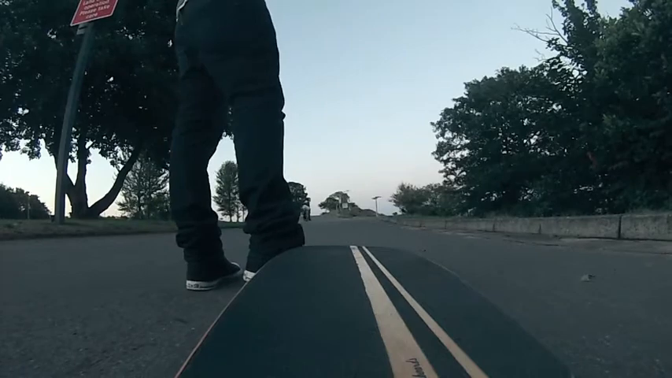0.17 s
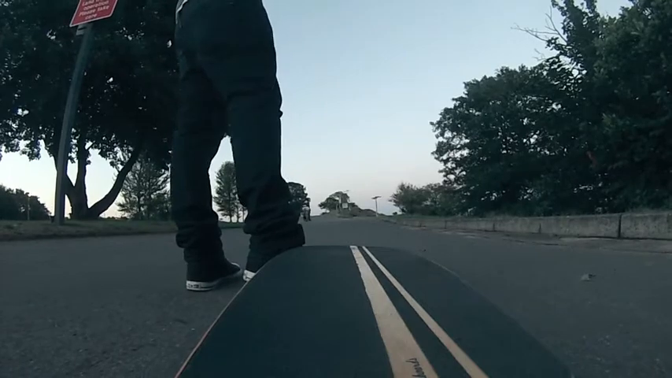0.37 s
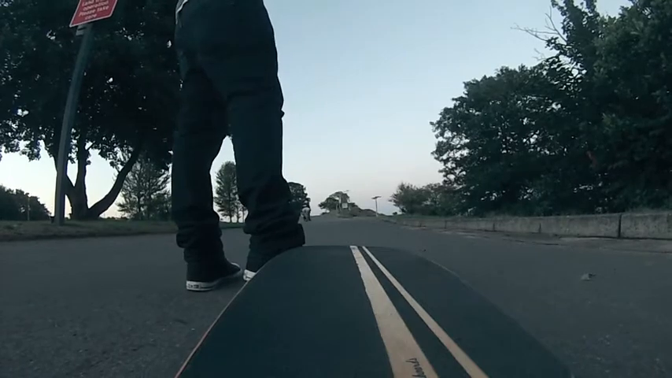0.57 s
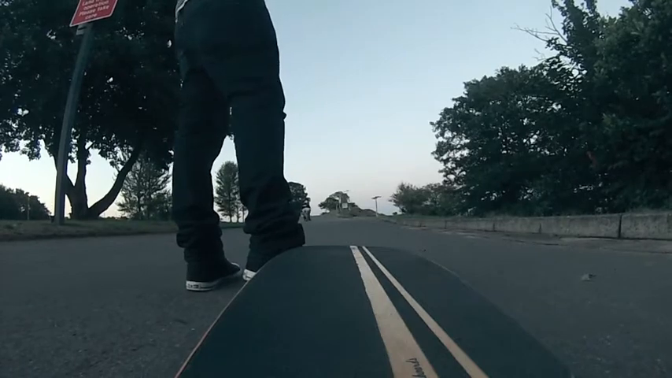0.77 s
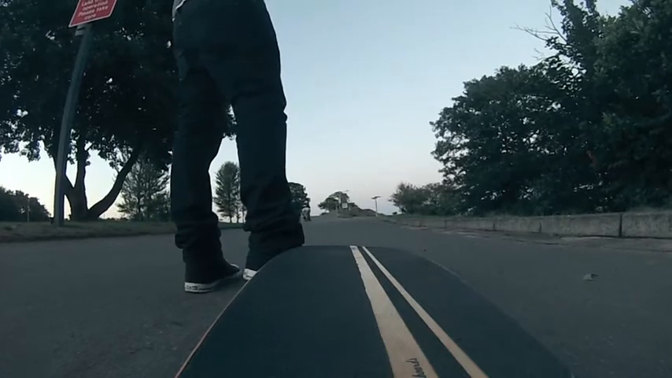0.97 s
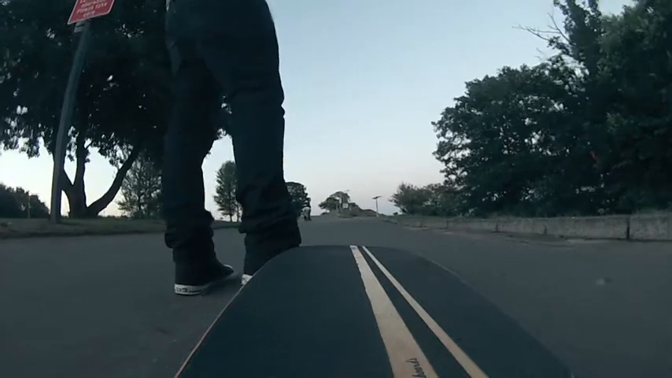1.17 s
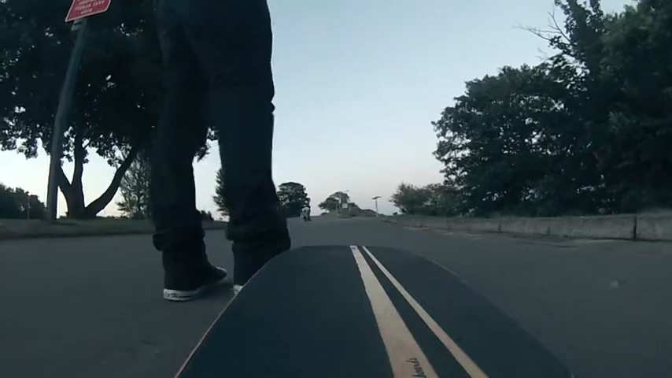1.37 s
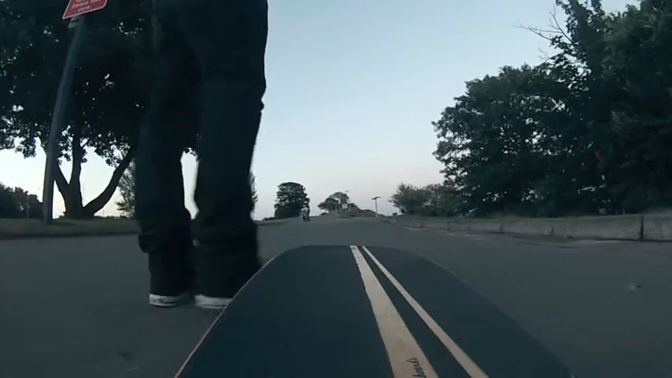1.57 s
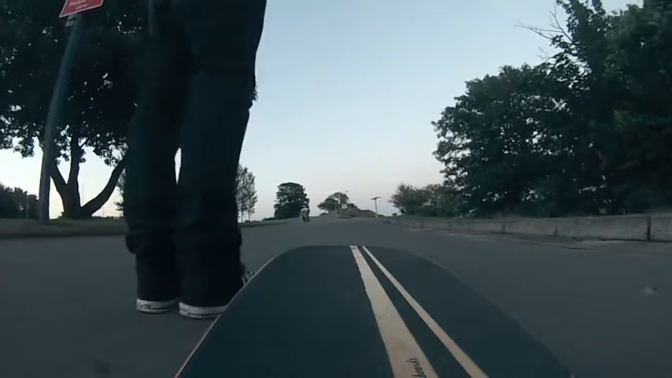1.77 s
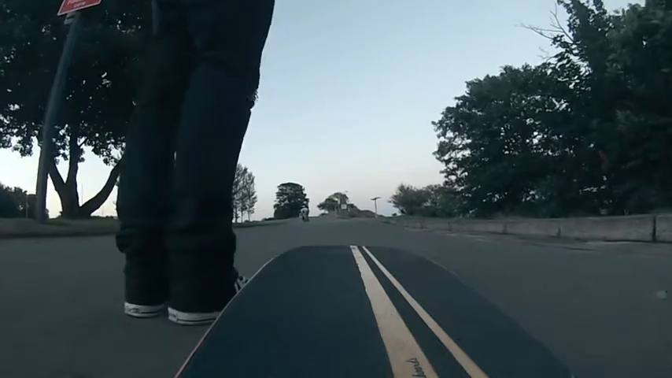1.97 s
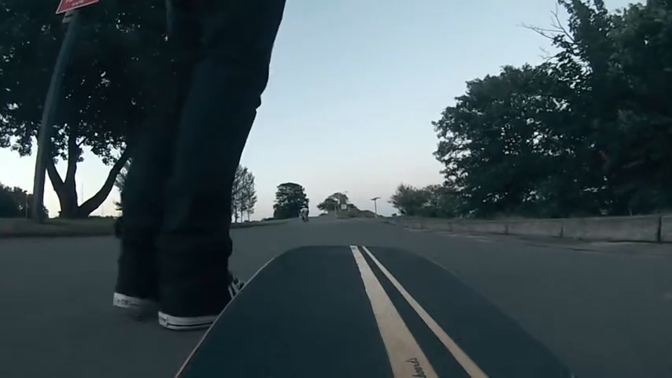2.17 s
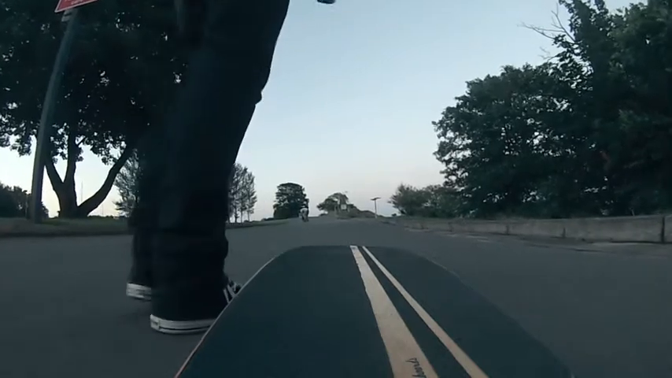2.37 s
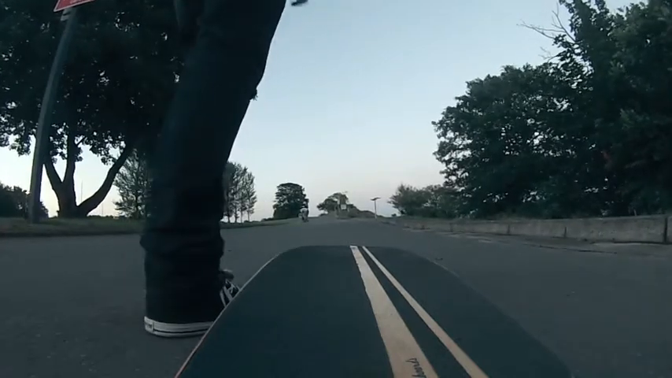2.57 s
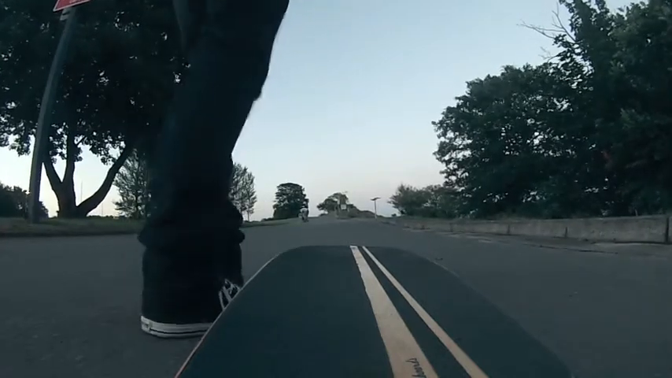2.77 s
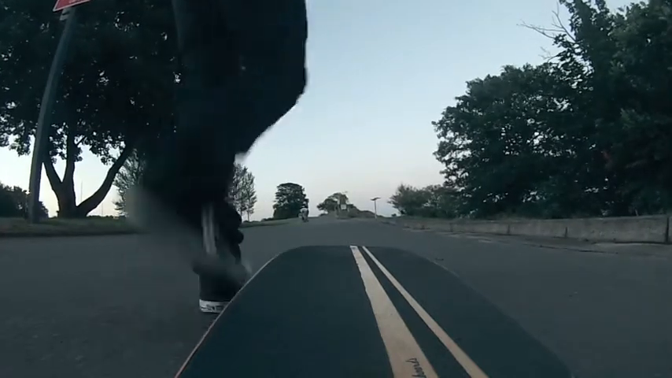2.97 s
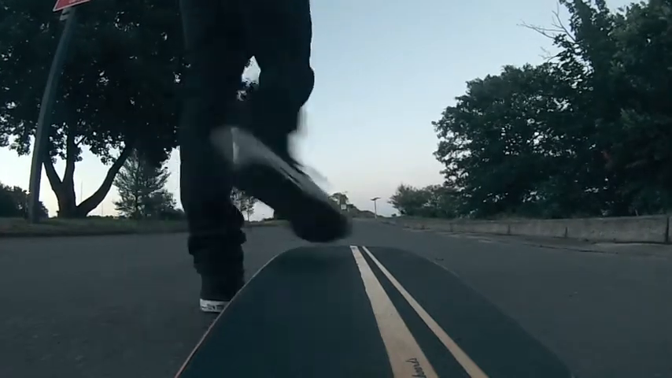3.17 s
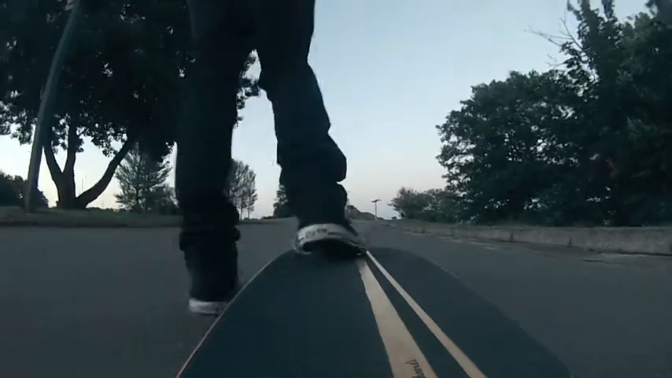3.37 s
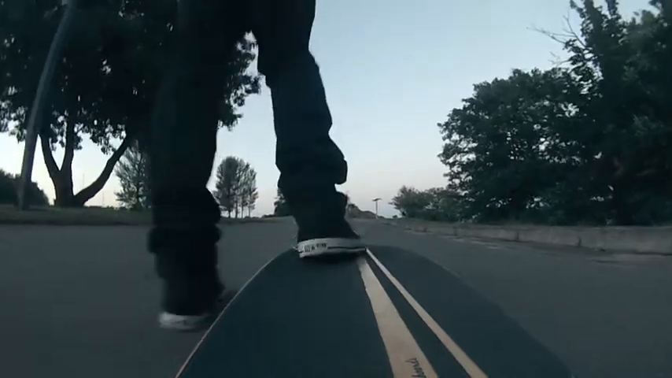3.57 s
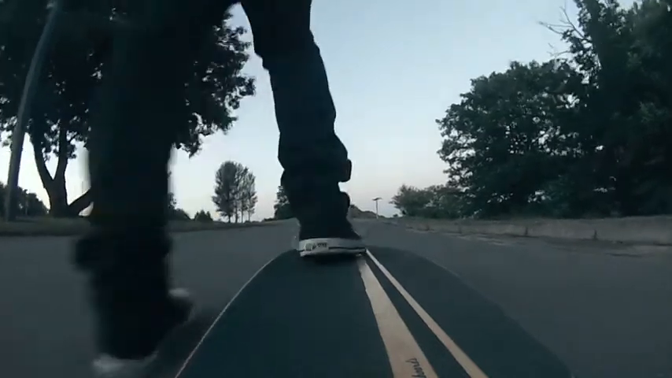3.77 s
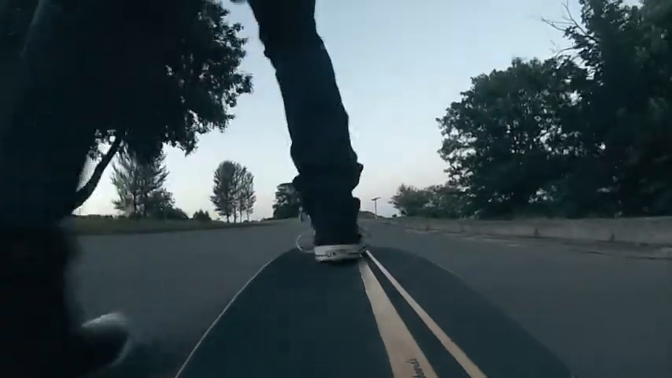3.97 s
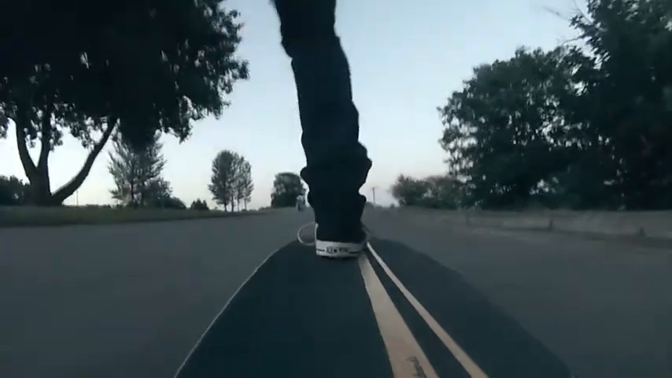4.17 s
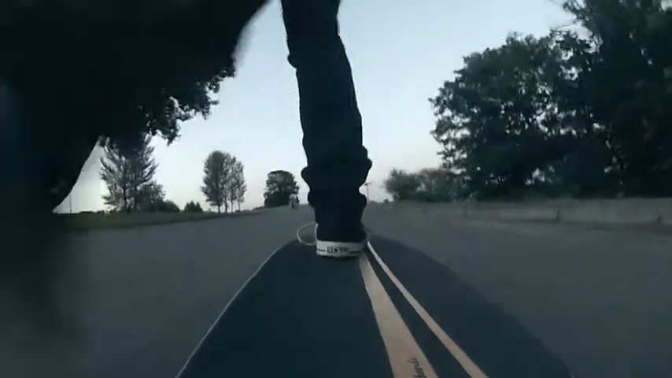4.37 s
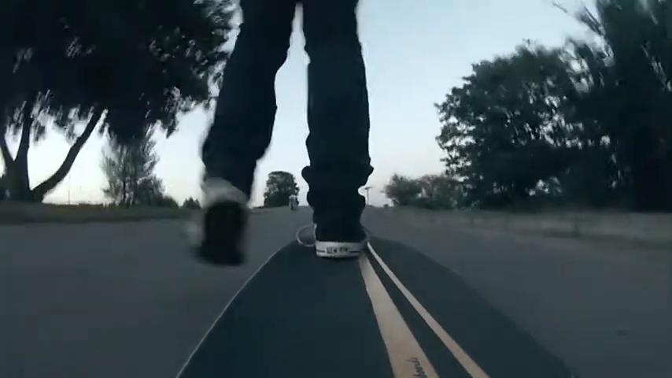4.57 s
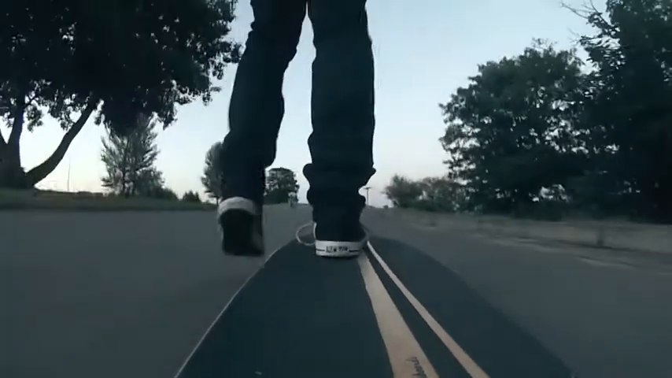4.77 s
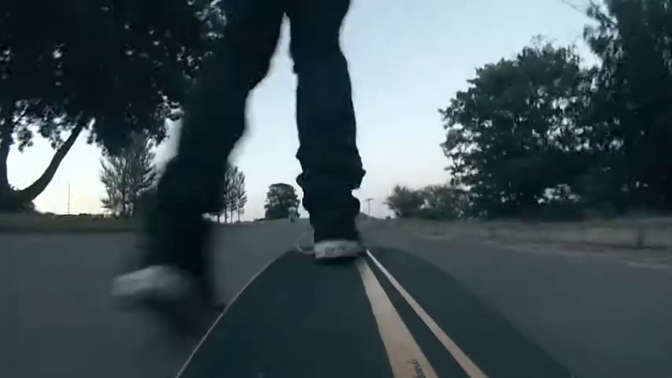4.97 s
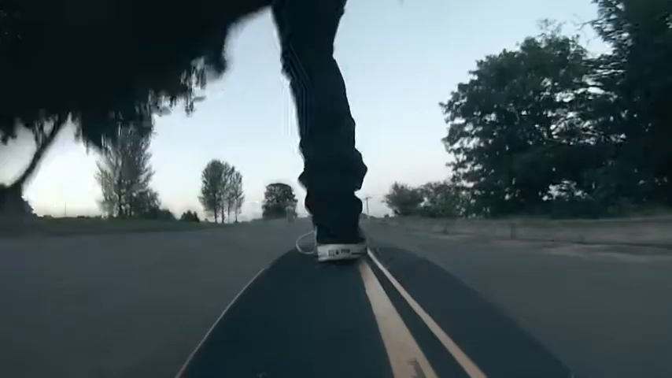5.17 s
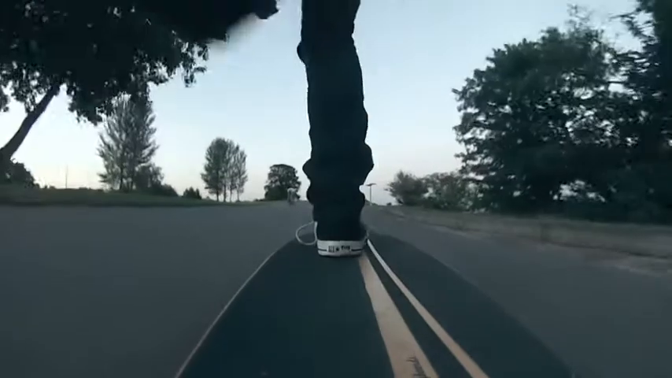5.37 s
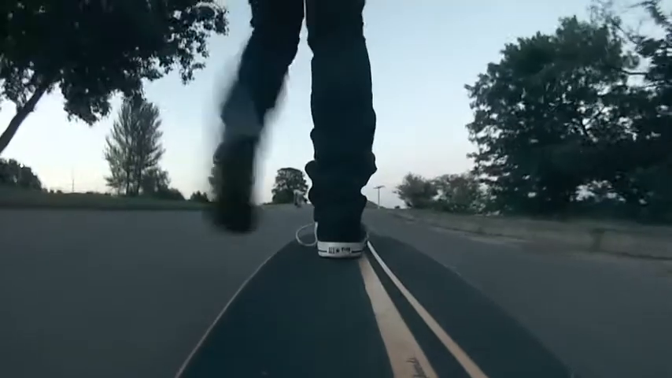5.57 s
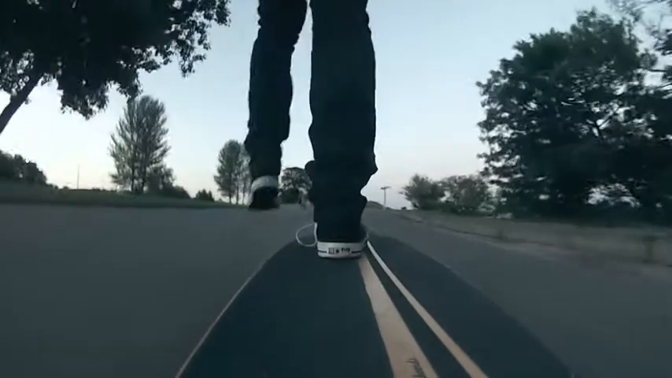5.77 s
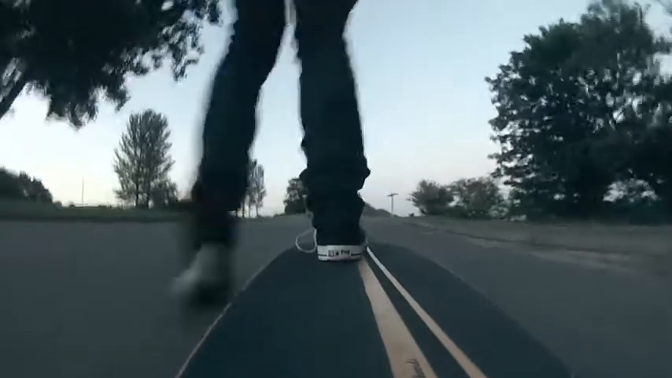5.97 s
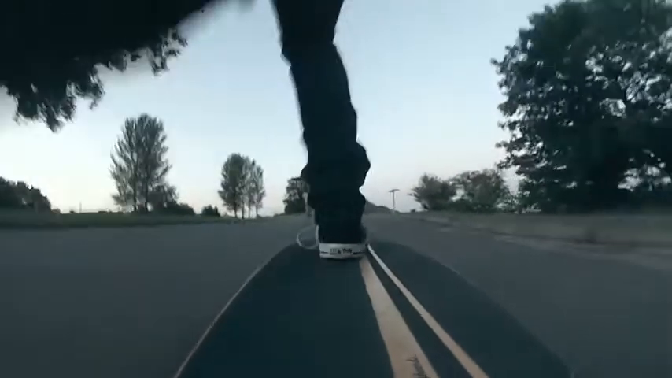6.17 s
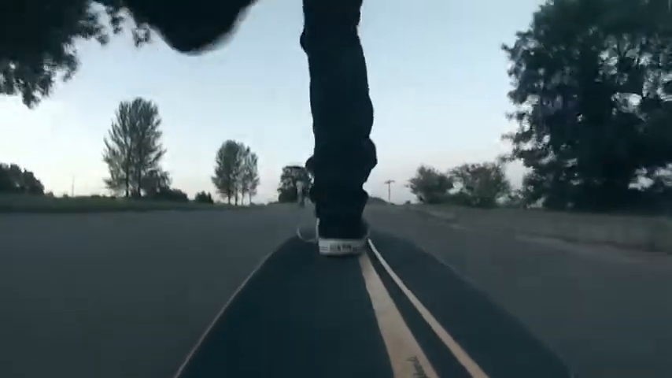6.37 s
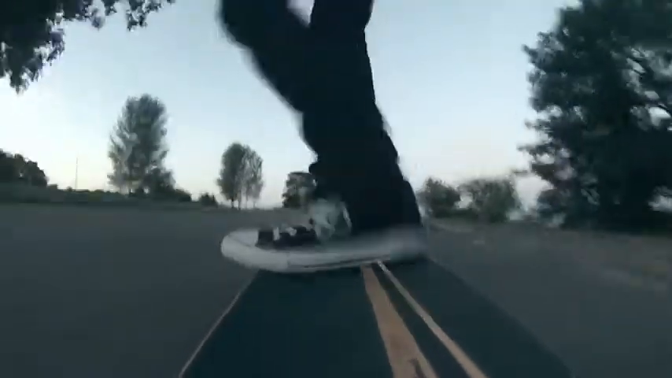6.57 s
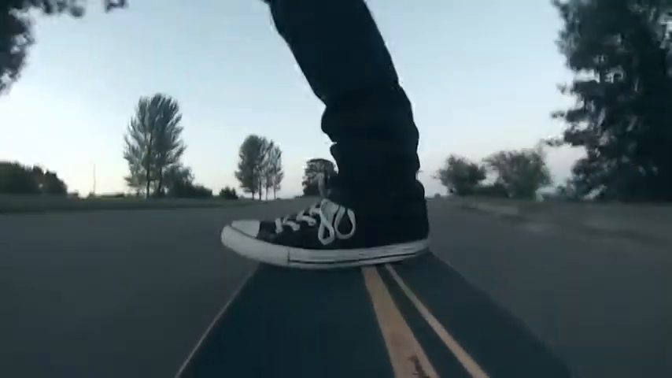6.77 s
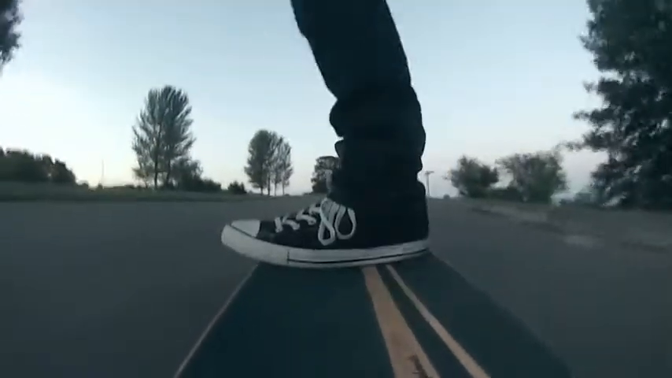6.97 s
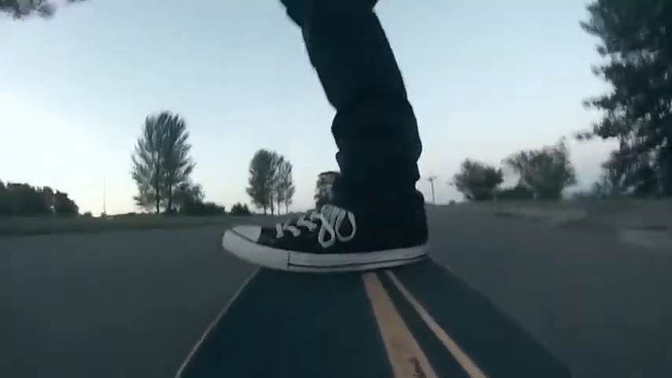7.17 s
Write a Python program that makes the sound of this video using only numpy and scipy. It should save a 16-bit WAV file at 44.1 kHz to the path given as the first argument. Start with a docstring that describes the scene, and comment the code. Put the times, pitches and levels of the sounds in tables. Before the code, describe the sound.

Quiet distant traffic hum, a few shoe ticks on wood, then a longboard rolls off with loud, hollow, rattling wheels over coarse asphalt.

```python
"""Far traffic roars, hisses and hums behind a longboard on a seafront path, the microphone fixed to its deck.
The rider shuffles: board and shoes tick, the deck sways, soles tap and scrape. A shoe lands, slides, and the
board rolls. Stones in the coarse asphalt knock the wheels and ring the deck's modes, over random fine grit,
a low rumble and a thin sizzle of tread noise. A limiter holds down the hardest knocks."""
import sys
import numpy as np
from scipy import signal
from scipy.fft import rfft, irfft, next_fast_len
from scipy.io import wavfile
from scipy.ndimage import uniform_filter1d, minimum_filter1d

SR = 44100
rng = np.random.default_rng(int(sys.argv[2]) if len(sys.argv) > 2 else 0)


def file_out(sig):
    """Save sig as 16-bit WAV at sys.argv[1]."""
    # one column per channel
    cols = np.atleast_2d(sig).T
    # limit, then scale
    lim = np.clip(cols, -1, 1)
    pcm = np.round(lim * 32767).astype(np.int16)
    wavfile.write(sys.argv[1], SR, pcm)


N = 317961
TIME = np.arange(N) / SR   # seconds

# Each push makes the board faster. Each row: time in seconds, speed as a share of cruising speed.
ROLLING_SPEED = [(3.3, 0.52), (4.3, 0.74), (5.0, 0.98), (5.4, 1.156), (6.2, 1.15), (7.2, 1.13)]
# How coarse the asphalt is under the wheels. Each row: time in seconds, coarseness in dB.
ASPHALT_COARSENESS = [(3.41, -7), (3.54, 8.5), (3.62, -8), (3.7, 3.5), (4.2, 1), (4.46, -8), (4.54, 6),
                      (4.66, 3.5), (4.75, -11), (4.785, 15.5), (4.85, -8), (4.94, 4), (5.05, -10),
                      (5.17, -1), (5.55, -6.5), (5.63, -10), (5.68, -6), (5.8, -2.5), (5.85, -20),
                      (5.9, 6.5), (6.01, -9), (6.14, 3.5), (6.22, 0.5), (6.47, -4), (6.51, -11), (6.56, -3),
                      (6.64, -2), (6.69, 9), (6.72, -4), (6.81, -1), (7.2, -4)]
# Colour of soft tread or sole on the road's fine texture. Each row: frequency in Hz, relative level in dB per Hz.
ROAD_HISS_COLOUR = [(2200, 10), (3000, 12), (4100, -6), (5000, -0.5), (5700, 5), (7100, 6), (8900, -4.5),
                    (10200, -1), (12500, -12), (15500, -27)]

START_S, START_RAMP_S = 3.22, 0.062   # the board begins to roll
# the deck's usual hollow body and treble, relative to its middle modes
DECK_BODY_DB, DECK_TREBLE_DB = -1.5, -12
# the pitch of ringing modes wanders: spread, and turns per second
WAVER_HZ, WAVERS_PER_S = 36.5, 30


def wheels():
    """Stones knock, grit rattles with speed and coarseness, the trucks ring on, and the road rumbles and sizzles."""
    # The biggest stones, before the deck's common gain. Each row: time in seconds, level in dB,
    # hollow body in dB relative to that level, treble in dB relative to that level.
    big_stones = [(3.436, -38.5, -0.5, -18), (3.4672, -30, -7, -12), (3.4854, -34, -6.5, -16),
                  (3.5385, -37, -8, -16), (3.5481, -35, -1, -13), (3.56, -37.5, -5.5, -16),
                  (3.596, -37.5, -2, -17), (3.6554, -38.5, 2.5, -16), (3.668, -44.5, -1, -9),
                  (3.6838, -39.5, -5, -17), (3.7016, -48, -2, -24), (3.732, -45, 6, -11),
                  (3.752, -33.5, -1, -19), (3.7803, -39.5, -4, -13), (3.8041, -22, 2, -14.5),
                  (3.8118, -41.5, -7, -11), (3.8195, -28.5, -4.5, -8), (3.843, -37, -1, -21),
                  (3.857, -32, -1, -23), (3.877, -27.5, -1, -9.5), (3.9112, -28.5, 2.5, -12.5),
                  (3.9273, -44, -6, -12), (3.9511, -20.5, -3, -12.5), (3.968, -45, -11, -14),
                  (3.989, -32.0, -4.5, -17), (4.0246, -29.5, 2.5, -17), (4.0309, -23, 5.5, 1),
                  (4.0382, -27, 5, -11), (4.0477, -32.0, -5, -8), (4.0745, -30, -4.5, -11.5),
                  (4.0891, -29.5, -3, -10.5), (4.1386, -36.5, -0.5, -12), (4.1615, -47, 2, -8),
                  (4.199, -39, 1, -15), (4.2155, -32.5, 5.5, -3), (4.237, -42.5, 5, -10),
                  (4.267, -35, 0, -13), (4.2873, -30, -5.5, -13.5), (4.3151, -37.0, -2, -15),
                  (4.373, -40.0, -12, -14.5), (4.395, -44.5, 6, -15), (4.4315, -45, 0, -16),
                  (4.4473, -46, 0, -13), (4.4544, -38, -3, -21), (4.485, -30, -6.5, -12.5),
                  (4.5048, -30.5, -8, -19), (4.5299, -35, 5, -5.5), (4.5376, -35, -2, -14),
                  (4.5531, -23, -5, -17), (4.5814, -32.0, 0, -12), (4.6013, -22.0, -7, -15),
                  (4.6175, -36, 6, -6), (4.6317, -26.5, -2, -9.5), (4.6446, -36, 2.5, -6),
                  (4.6578, -25.5, -3, -13), (4.6855, -35.5, -4, -10), (4.702, -35.5, 2, -8.5),
                  (4.7253, -39.5, 0.5, -13), (4.7766, -40, 9.5, -25), (4.7949, -12.5, 2.5, -8),
                  (4.8363, -31, -12, -10.5), (4.883, -27.5, -6.5, -9), (4.892, -33, -6, -16),
                  (4.9185, -37, -11, -20), (4.9296, -22.5, -15, -10), (4.9428, -32.5, 3.5, -10),
                  (4.9668, -24, -3.5, -11.5), (4.9865, -37, 2, -8), (5.0089, -18, -5, -10.5),
                  (5.022, -36, -10, -7), (5.0748, -29.5, 1, -1.5), (5.0848, -31.5, -5, -11),
                  (5.1109, -31, -15, -14), (5.1205, -26, -8.5, -7), (5.1633, -29.5, 1.5, -8),
                  (5.1728, -31, 7, -11), (5.233, -38.5, -1, -8), (5.2415, -35.5, -1, -14),
                  (5.2582, -35.0, -7, -8.5), (5.27, -37, -6, -18), (5.299, -34.5, -7, -7.5),
                  (5.317, -37, 4, -17), (5.3251, -34.5, 0, -15), (5.3406, -36, 7.5, -4.5),
                  (5.353, -30, -13, -16), (5.369, -28, -1, -2.5), (5.3744, -19, -4, -17),
                  (5.4211, -36, -5, -14), (5.4257, -39.0, -4, -10), (5.4437, -31, 1.5, -6.5),
                  (5.4758, -27.5, -13, -14.5), (5.51, -30, 0.5, -10), (5.5173, -34.5, -11, -16),
                  (5.523, -34, 0, -3), (5.5353, -27.0, 1, -11.5), (5.5702, -23, -3, -10.5),
                  (5.6026, -37, -10, -5.5), (5.6744, -33.5, -3, -7.5), (5.7043, -21.5, -10, -13),
                  (5.719, -33, 0, -12), (5.7301, -19.5, -1.5, -16), (5.761, -28.5, -14, -5.5),
                  (5.7745, -42, -1, -14), (5.788, -30, -2, -3), (5.7941, -30.5, -2, -14),
                  (5.817, -33, 0, -5), (5.8737, -39.5, 5, -8), (5.895, -32, -4.5, -11.5),
                  (5.912, -39, -3, -9), (5.9253, -33.5, -5, -7), (5.9408, -38.5, 5, -5),
                  (5.9721, -30.0, -2, -7), (5.987, -39, -4, -14), (6.038, -35.5, 0, -20),
                  (6.0476, -26, -7, -22), (6.0827, -37, 1, -8), (6.0886, -33, -6, -6.5),
                  (6.0942, -32.5, -1, -20), (6.118, -33.0, 4, -9), (6.1283, -29.5, -7, -18),
                  (6.1378, -36, 1, -8), (6.1547, -27.5, -3, -10.5), (6.1618, -31.5, 2, -5),
                  (6.1855, -29, -2.5, -11), (6.2222, -40, 1, -20), (6.2447, -34, -6, -15),
                  (6.2623, -32, -4, -6), (6.2727, -38, -6, -11), (6.3005, -41, 4, -16),
                  (6.3154, -27.5, -10, -19), (6.3192, -24, -8, -13), (6.3375, -33.5, -6, 0.5),
                  (6.345, -35, -4, -9), (6.3842, -32, 0, -5), (6.4011, -33.5, 1, -11),
                  (6.4092, -37, -4, -8), (6.4208, -30, -11, -9), (6.428, -26, -10, -7),
                  (6.4376, -27.5, -10, -7), (6.446, -35, -10, -10), (6.465, -27, -10, -9.5),
                  (6.476, -26.5, -4, -11), (6.4859, -31, -6, -11), (6.5216, -30.5, -7, -17),
                  (6.5459, -29, -5.5, -7), (6.5602, -32.5, 0, -13), (6.5759, -30, 2, -18),
                  (6.6054, -38, -3, -9), (6.6239, -37, -5, -9), (6.6398, -29, -12, -14.5),
                  (6.6644, -29, -4, -15.5), (6.679, -37, -11, -14), (6.6849, -40, 1, -16),
                  (6.6963, -12.5, -11, -12), (6.7326, -30, -5, -13), (6.7438, -33, -11, -17),
                  (6.7688, -36.5, 4, -8), (6.7856, -35, -8, -4), (6.8051, -25, -4, -13),
                  (6.815, -41, 2, -3), (6.8212, -38, -5, -12), (6.8294, -35, -12, -3.5),
                  (6.8445, -44, -10, -10), (6.8659, -32.5, 1, -10), (6.8731, -30.5, -5, -5.5),
                  (6.9025, -25.5, -1.5, -18), (6.9093, -32, 0, 0), (6.9361, -33.5, -5, -11),
                  (6.9917, -27, -14, -8.5), (6.9998, -35, -1.5, -11), (7.0525, -30, 1, -8),
                  (7.072, -30, -6, -14.5), (7.0968, -38, -1, -11), (7.1381, -37.5, 0, -21),
                  (7.1462, -31.5, 3, -8.5), (7.1728, -33, 2.5, -16), (7.1799, -20, -8, -2),
                  (7.1981, -32, 2, -9)]
    # Longer, purer rings of the metal trucks. Each row: frequency in Hz, width in Hz, relative level in dB.
    truck_modes = [(694, 8.3, -29), (856, 20, -16), (910, 19, -23)]
    grit_cruising_db, grit_db_per_doubling = -38.5, 17   # growth per doubling of speed

    speed, coarse_db = in_time(ROLLING_SPEED)[0], in_time(ASPHALT_COARSENESS)[0]
    moving = np.clip((TIME - START_S) / START_RAMP_S, 0, 1)
    hits = np.r_[pebbles(), big_stones]
    sizzle = tread(hits, coarse_db, crunch_s=0.0013)
    grit_db = grit_cruising_db + grit_db_per_doubling * np.log2(speed) + coarse_db
    grit = grains(per_s=1700, spread_db=10, body_db=2.0, treble_db=-4.5, scatter_db=4.0, even_s=0.04)
    rattle = stones(hits, clean_db=0.5) + from_db(grit_db) * grit
    trucks = np.zeros(N)
    for hz, width, db in truck_modes:
        per_click = 2 * np.pi * width / SR   # a narrow mode gathers less from each click
        trucks += from_db(db) * per_click * wavering_ring(rattle, hz, width, WAVER_HZ)
    return moving * (rattle + trucks + rumble() + sizzle)


def stones(hits, clean_db):
    """A slow wheel meets a stone more cleanly; a fast one chatters more. Each also nudges the whole deck."""
    common_db, thud_db = 22.5, -20
    s, db, body, treble = np.transpose(hits)
    speed = np.interp(s, *np.transpose(ROLLING_SPEED))
    clack = knocks(s, db, body - DECK_BODY_DB, treble - DECK_TREBLE_DB, scatter_db=3.0, graze_s=0.0044,
                   graze_db=-3.0 - clean_db * (1.0 - speed), graze_treble_db=0.5, contact_hz=11300)
    thuds = ring(click_train(s, from_db(db + thud_db)), hz=250, width=29)
    return from_db(common_db) * clack + thuds


def pebbles(count=260):
    """Small stones at uneven spacings: more, louder and harder with speed, louder on coarse asphalt."""
    # at cruising speed; the spread is the most that chance adds or takes away
    per_s, cruising_db, spread_db, cruising_treble_db = 50, -43, 4.0, -12
    # growth per doubling of speed, and the share of the asphalt's coarseness that is followed
    db_per_doubling, treble_db_per_doubling, follows = 13.5, 10, 0.49

    gap, size, hollow, edge = rng.uniform(-1, 1, (count, 4)).T
    speed, coarse_db = in_time(ROLLING_SPEED)[0], in_time(ASPHALT_COARSENESS)[0]
    travelled = np.cumsum(speed * (TIME > START_S)) / SR
    places = np.cumsum(1 + 0.88 * gap) / per_s
    s = np.interp(places, travelled, TIME, right=2 * TIME[-1])   # stones never reached fall past the end
    doublings = np.log2(np.interp(s, TIME, speed))
    db = cruising_db + db_per_doubling * doublings
    db = db + follows * np.interp(s, TIME, coarse_db) + spread_db * size
    body = DECK_BODY_DB + 6 * hollow
    treble = cruising_treble_db + treble_db_per_doubling * doublings + 5 * edge
    return np.c_[s, db, body, treble]   # columns as for the biggest stones


def tread(hits, coarse_db, crunch_s):
    """Under load the soft wheels sizzle unevenly on fine texture; the harder a stone, the more it crunches."""
    loaded_s, loading_s = 4.47, 0.07
    loaded_db, unloaded_change_db, follows, crunch_db = -67, -39, 0.36, -17
    s, db, body, treble = np.transpose(hits)
    unloaded = 1 - np.clip((TIME - loaded_s) / loading_s, 0, 1)
    hiss_db = loaded_db + unloaded_change_db * unloaded + follows * coarse_db
    clicks = click_train(s, from_db(db + treble + crunch_db))
    crunch = signal.lfilter([1], [1, -np.exp(-1 / (crunch_s * SR))], clicks + 1e-18)
    return noise(ROAD_HISS_COLOUR) * (from_db(hiss_db + 8.0 * drift(270)) + crunch)


def rumble():
    """The faster the road's unevenness passes, the higher the rumble; the deck drones above it."""
    # Rumble at cruising speed. Each row: frequency in Hz, relative level in dB per Hz.
    rumble_colour = [(55, -3), (85, -2), (115, 6), (150, 0), (190, -3), (240, -7), (310, -8.5), (400, -28)]
    # Rumble over time, before its trim. Each row: time in seconds, level in dB.
    rumble_curve = [(3.38, -52), (3.56, -41), (3.6, -45), (3.84, -41), (3.95, -47), (4.03, -41),
                    (4.07, -50), (4.25, -43), (4.36, -48.5), (4.38, -42), (4.59, -39), (4.67, -56),
                    (4.79, -38), (4.82, -51), (4.94, -39), (5.04, -55), (5.07, -43.5), (5.34, -47.5),
                    (5.38, -38), (5.4, -65), (5.43, -55), (5.54, -44), (5.61, -67), (5.67, -48),
                    (5.78, -45), (5.84, -52), (5.87, -45), (7.2, -47.5)]
    # The deck's drone. Each row: frequency in Hz, relative level in dB per Hz.
    drone_colour = [(170, -8.5), (240, 1), (310, -6), (400, -13), (560, -5.5), (800, -12)]
    # Drone over time, before its trim. Each row: time in seconds, level in dB.
    drone_curve = [(3.38, -66), (3.46, -51), (4.22, -47), (4.33, -50), (4.52, -43), (4.74, -47.5),
                   (4.79, -40), (4.82, -48.5), (5.38, -48.5), (5.4, -71), (5.58, -54), (5.6, -67),
                   (5.72, -48), (5.75, -57), (6.09, -38.5), (6.42, -46), (6.68, -38), (6.74, -58),
                   (7.17, -48), (7.2, -60)]
    rumble_trim_db, drone_trim_db = 2, -2.5

    distance = np.cumsum(in_time(ROLLING_SPEED)[0])
    unevenness = np.interp(distance % N, np.arange(N), noise(rumble_colour))
    low = from_db(rumble_trim_db + in_time(rumble_curve)[0]) * steady(unevenness, even_s=0.066)
    drone = steady(noise(drone_colour), even_s=0.076)
    return low + from_db(drone_trim_db + in_time(drone_curve)[0]) * drone


def deck(times, sizes, body_db, treble_db, scatter_db, contact_hz=11500):
    """Contacts ring the deck's modes with chosen body and treble; the lower modes waver as the deck flexes."""
    # Ringing of deck, trucks and microphone mount. Each row: frequency in Hz, width in Hz, relative level in dB.
    modes = [(550.5, 56, -16), (679, 74, -8.5), (881, 85, 1), (1109, 223, -4.5), (1462, 172, -4),
             (1746, 187, -6), (1935, 164, -9), (2510, 102, -20.5), (2755, 164, -20), (3180, 290, -21.5),
             (4134, 234, -22), (5057, 220, -27.5), (6340, 580, -41), (7220, 580, -40.5), (8300, 780, -50.5),
             (9900, 990, -56), (12050, 550, -53.5)]
    out, total = np.zeros(N), 0
    luck = np.clip(rng.standard_normal((len(times), len(modes))), -2, 2)
    for k, (hz, width, db) in enumerate(modes):
        low = np.interp(hz, [900, 1200], [1, 0])
        high = np.interp(hz, [1800, 2800], [0, 1])
        gain_db = low * body_db + high * treble_db + scatter_db * luck[:, k]
        clicks = click_train(times, sizes * from_db(gain_db))
        height = from_db(db) * width
        rung = wavering_ring(clicks, hz, width, WAVER_HZ) if high < .5 else ring(clicks, hz, width)
        out += (-1) ** k * height * rung
        total += height
    soften = signal.butter(2, min(contact_hz, SR / 2 - 1000), fs=SR, output="sos")
    return signal.sosfilt(soften, out / total)


def knocks(s, db, body_db, treble_db, scatter_db, graze_s, graze_db, graze_treble_db, contact_hz, count=6):
    """Each knock is followed by grazes that thin out and tend to weaken as the contact lets go."""
    when, strength = rng.uniform(-1, 1, (len(s), 2, count)).transpose(1, 2, 0)
    late = .1 + 0.84 * when ** 2   # share of graze_s
    times = np.vstack([s, s + graze_s * late])
    sizes = np.vstack([from_db(db), from_db(db + graze_db) * strength * (1 - 0.34 * late)])
    treble = np.vstack([treble_db, treble_db + graze_treble_db * late])
    body = np.broadcast_to(body_db, times.shape)
    return deck(times.ravel(), sizes.ravel(), body.ravel(), treble.ravel(), scatter_db, contact_hz)


def grains(per_s, spread_db, body_db, treble_db, scatter_db, even_s):
    """Countless small contacts of uneven size on the deck, the bigger ones harder; level held near 1."""
    at = np.flatnonzero(rng.random(N) < per_s / SR)
    bigness = np.clip(rng.standard_normal(N), -2, 2)[at]
    sizes = from_db(spread_db * bigness) * rng.choice([-1, 1], N)[at]
    return steady(deck(at / SR, sizes, body_db, treble_db + 1.6 * bigness, scatter_db), even_s)


def rider():
    """The rider makes the board tick, sway and bounce; the soles tap, scrape, land and skid."""
    feet = taps(width_hz=107, contact_hz=2500) + soles() + landing()
    return ticks(softening=0.5) + feet + sway() + bounce()


def ticks(softening):
    """Crisp ticks of the board and of shoes slapping and scuffing on it, through the same deck modes."""
    # Ticks of the board and of shoes on it, before the common gain. Each row: time in seconds, level in dB,
    # treble in dB relative to that level; only its departure from the median counts, scaled by softening.
    deck_ticks = [(1.158, -30, -34), (1.168, -33, -24), (1.173, -31, -18), (1.179, -21, -32),
                  (1.198, -31, -26), (1.215, -27.5, -26), (1.221, -36, -23), (1.231, -33, -26),
                  (1.264, -28, -25), (1.278, -40, -29), (1.292, -30, -30), (1.309, -39, -24),
                  (1.318, -37, -30), (1.342, -42, -28), (1.425, -33.5, -25), (1.441, -38, -24),
                  (1.449, -37, -25), (1.469, -30, -36), (3.23, -32, -28), (3.2335, -27, -15),
                  (3.265, -28, -35), (3.281, -27.5, -32), (3.319, -27.5, -33), (3.328, -35, -25),
                  (3.358, -33, -26), (3.447, -33, -22)]
    common_db = 9.0
    s, db, treble = np.transpose(deck_ticks)
    treble_db = 0.5 + softening * (treble - np.median(treble))
    crisp = knocks(s, db, -1.0, treble_db, scatter_db=1.5, graze_s=0.004, graze_db=-9.0,
                   graze_treble_db=-2.0, contact_hz=5500)
    return from_db(common_db) * crisp


def soles():
    """Each scrape is rubber slipping and grit crackling under it; on the road the shoe skids with a thin hiss."""
    # Colour of slipping rubber. Each row: frequency in Hz, relative level in dB per Hz.
    rubber_colour = [(120, -25), (200, -3), (373, -18.5), (551, 0), (635, -14), (707, 4), (990, -5),
                     (1230, -9.5), (1810, -9), (2020, -8), (3040, -22), (5170, -17), (6180, -29),
                     (11700, -58), (14000, -67)]
    # Shoes scrape on the road, then over the grip tape. Each row: peak time in seconds, rubber level in dB,
    # grit level in dB, attack in seconds, fall in dB per second.
    scrapes = [(1.18, -65, -52, 0.025, 54), (1.45, -75, -56, 0.042, 150), (3.2295, -40.5, -49, 0.0027, 313)]
    # The pushing shoe skids on the road. Each row: peak time in seconds, level in dB before flicker.
    shoe_skids = [(4.05, -63), (4.163, -68), (4.21, -62), (4.255, -85), (4.38, -77), (4.424, -83),
                  (4.56, -67), (4.786, -48.5)]
    skid_attack_s, skid_fall_db_per_s, skid_flicker_db = 0.011, 247, 7.5

    rubber = sum(stroke(s, db, attack_s, fall) for s, db, grit_db, attack_s, fall in scrapes)
    grit = sum(stroke(s, grit_db, attack_s, fall) for s, db, grit_db, attack_s, fall in scrapes)
    skid = sum(stroke(s, db, skid_attack_s, skid_fall_db_per_s) for s, db in shoe_skids)
    crackle = grains(per_s=230, spread_db=9.0, body_db=9.0, treble_db=-28.0, scatter_db=3.0, even_s=0.079)
    slipping = rubber * from_db(2.6 * drift(400)) * noise(rubber_colour)
    skidding = skid * from_db(skid_flicker_db * drift(270)) * noise(ROAD_HISS_COLOUR)
    return slipping + grit * crackle + skidding


def landing():
    """A shoe slides to rest on the grip tape: it slips in quick grains that excite a falling resonance."""
    lands_s, slide_s = 3.2305, 0.062
    start_hz, end_hz, width_hz = 1500, 520, 260
    slide_db, fall_db_per_s = -42.5, 78
    done = (TIME - lands_s) / slide_s
    hz = np.interp(done, [0, 1], [start_hz, end_hz])
    slips = rng.standard_normal(N) * (rng.random(N) < 1200 / SR)   # 1200 slips a second
    rasp = steady(wavering_ring(slips, hz, width_hz, WAVER_HZ), even_s=0.008)
    stopping = np.clip((lands_s + slide_s - TIME) / 0.008 + 1, 0, 1)
    return rasp * stopping * stroke(lands_s, slide_db, 0.003, fall_db_per_s)


def stroke(s, db, attack_s, fall_db_per_s):
    """Envelope of one scrape: a quick rise to its peak at time s, then a steady fall."""
    return np.clip(1 + (TIME - s) / attack_s, 0, 1) * from_db(db - fall_db_per_s * np.maximum(TIME - s, 0))


def taps(width_hz, contact_hz):
    """A soft sole sets the wood ringing briefly; a low-pass takes off the click."""
    # Taps of the rubber soles. Each row: time in seconds, ring in Hz, level in dB before the low-pass.
    sole_taps = [(1.179, 620, -34), (1.216, 600, -36), (1.737, 1570, -40.5), (2.8997, 760, -34.5),
                 (3.2284, 970, -34), (3.2354, 1410, -36), (3.266, 1010, -39), (3.281, 1250, -29),
                 (3.282, 546, -30.5), (3.288, 710, -40), (3.318, 1170, -35)]
    rings = sum(ring(click_train(np.array([s]), from_db([db])), hz, width_hz) for s, hz, db in sole_taps)
    return signal.sosfilt(signal.butter(2, contact_hz, fs=SR, output="sos"), rings)


def sway():
    """The deck sways on its bushings: steady low noise under a drawn level."""
    # Colour of the sway. Each row: frequency in Hz, relative level in dB per Hz.
    sway_colour = [(18, 1), (28, 5), (38, 3.5), (48, 13.5), (58, 5.5), (72, 0.5), (130, -11.5)]
    # Sway over time, before its trim. Each row: time in seconds, level in dB.
    sway_curve = [(0.0, -50), (0.8, -50.5), (1.25, -38.5), (2.05, -44.5), (2.55, -53.5), (3.3, -50),
                  (3.39, -38), (3.72, -40.5), (4.1, -51), (4.21, -41), (4.33, -46), (4.85, -44),
                  (5.15, -74), (5.65, -70), (5.85, -65), (6.1, -42), (6.42, -57), (6.66, -41), (6.75, -67),
                  (7.2, -54)]
    trim_db = -5.5
    return from_db(in_time(sway_curve)[0] + trim_db) * steady(noise(sway_colour), even_s=0.13)


def bounce():
    """Jolts make the whole deck bounce: a low ring against a shorter, higher one."""
    # Each row: time in seconds, blow in dB before its trim.
    jolts = [(1.157, -32), (1.468, -34), (4.022, -26.5), (4.208, -26), (4.791, -20.5), (5.363, -32)]
    trim_db = -0.5
    s, db = np.transpose(jolts)
    blows = click_train(s, from_db(db + trim_db))
    return ring(blows, hz=62, width=16) - 1.3 * ring(blows, hz=165, width=200)


def traffic():
    """Far tyre roar recedes, its hiss fading faster, then both hold; an engine hums on a wandering note."""
    # Colour of the roar. Each row: frequency in Hz, relative level in dB per Hz.
    roar_colour = [(70, -9), (95, -22), (120, -4), (190, -9.5), (225, -5.5), (370, -10.5), (490, -9.5),
                   (570, -10), (860, -6), (1050, -7), (1300, -24), (2000, -62)]
    # Colour of the hiss. Each row: frequency in Hz, relative level in dB per Hz.
    hiss_colour = [(700, -33), (1100, 2), (1500, 0), (1850, -2.5), (2250, -16.5), (2750, -12), (3400, -18),
                   (4100, -16.5), (4600, -25.5), (5100, -21.5), (5800, -28), (7800, -35.5), (9500, -44),
                   (15000, -61)]
    # The far engine's hum. Each row: time in seconds, level in dB.
    hum_curve = [(0.05, -69), (0.2, -52), (1.0, -54), (2.05, -52), (2.8, -55), (3.1, -61)]
    # levels at the start, rates of fading, and how long the fade lasts
    roar_db, roar_fade_db_per_s, hiss_db, hiss_fade_db_per_s, recedes_s = -50, 2, -54.5, 3.5, 3.16
    hum_hz, hum_wander_hz = 84.9, 0.88

    fading_s = np.minimum(TIME, recedes_s)
    roar = from_db(roar_db - roar_fade_db_per_s * fading_s) * noise(roar_colour)
    hiss = from_db(hiss_db - hiss_fade_db_per_s * fading_s) * noise(hiss_colour)
    phase = 2 * np.pi * np.cumsum(hum_hz + hum_wander_hz * drift(4.1)) / SR
    hum = np.sqrt(2) * np.sin(phase)   # rms 1
    return roar + hiss + from_db(in_time(hum_curve)[0]) * hum


def from_db(db):
    """Decibels to gain."""
    return 10 ** (np.asarray(db) / 20)


def rms_one(x):
    """Scale to unit rms."""
    return x / np.sqrt(np.mean(x ** 2) + 1e-20)


def in_time(rows):
    """Each column of a curve, at every sample."""
    s, *columns = np.transpose(rows)
    return [np.interp(TIME, s, c) for c in columns]


def noise(spectrum):
    """Noise of a given colour, silent beyond its end frequencies; rms 1."""
    hz, db = np.transpose(spectrum)
    size = next_fast_len(N)
    bins = np.maximum(np.arange(size // 2 + 1) * SR / size, 1)
    gain = from_db(np.interp(np.log(bins), np.log(hz), db, left=-np.inf, right=-np.inf))
    return rms_one(irfft(rfft(rng.standard_normal(size)) * gain, size)[:N])


def drift(rate):
    """Chance values joined by straight lines, `rate` a second; spread about 1, without far outliers."""
    return np.clip(rms_one(np.interp(TIME * rate, np.arange(N), rng.standard_normal(N))), -2, 2)


def steady(x, even_s):
    """Hold the level near 1, so that only the fine texture is left to chance."""
    size = int(even_s * SR)
    power = uniform_filter1d(uniform_filter1d(x ** 2, size), size)
    return x / np.sqrt(np.maximum(power, 1e-9))


def click_train(times, sizes):
    """Clicks of the given sizes at the given times."""
    return np.bincount(np.clip(times * SR, 0, N).astype(int), sizes, N + 1)[:N]


def ring(clicks, hz, width):
    """A unit click sets a decaying sine ringing from a height of 1."""
    r, w = np.exp(-np.pi * width / SR), 2 * np.pi * hz / SR
    return signal.lfilter([0, np.sin(w)], [1, -2 * r * np.cos(w), r * r], clicks + 1e-18)


def wavering_ring(clicks, hz, width, waver_hz):
    """A ringing mode whose pitch wanders by chance."""
    phase = 2 * np.pi * np.cumsum(hz + waver_hz * drift(WAVERS_PER_S)) / SR
    cos, sin = np.cos(phase), np.sin(phase)
    decay = np.exp(-np.pi * width / SR)
    held = signal.lfilter([1], [1, -decay], np.array([cos, sin]) * clicks + 1e-18)
    return sin * held[0] - cos * held[1]   # each click starts at zero phase


def scene():
    """One microphone: both channels carry the same sound."""
    return np.tile(wheels() + rider() + traffic(), (2, 1))


def limiter(x, ceiling_db, release_db_per_s):
    """The gain ducks just ahead of a peak and climbs back steadily."""
    over = np.maximum(20 * np.log10(np.abs(x[0]) + 1e-9) - ceiling_db, 0)
    release = release_db_per_s * TIME
    held = np.maximum.accumulate(over + release) - release
    return x * from_db(uniform_filter1d(minimum_filter1d(-held, size=33), size=33))


def record(dry):
    """Limiter, a trace of hiss in each channel, and the top cut."""
    cutoff_hz, hiss_db = 15500, -87
    held = limiter(dry, ceiling_db=-15.0, release_db_per_s=392)
    hissing = held + from_db(hiss_db) * rng.standard_normal((2, N))
    return signal.sosfilt(signal.ellip(10, .1, 80, cutoff_hz, fs=SR, output="sos"), hissing)


dry = scene()
out = record(dry)
file_out(out)
```